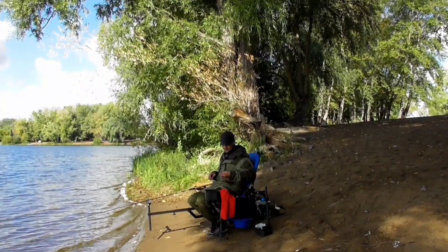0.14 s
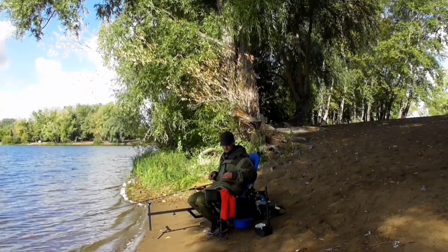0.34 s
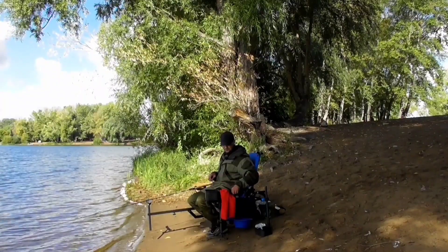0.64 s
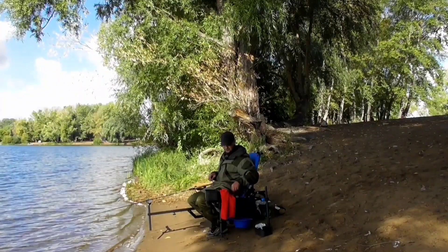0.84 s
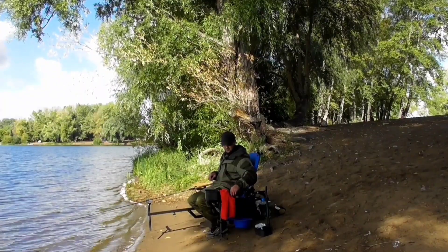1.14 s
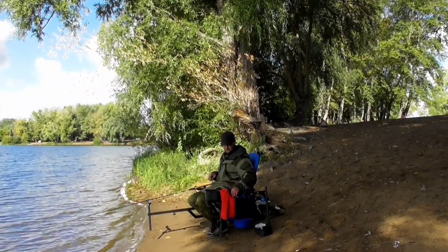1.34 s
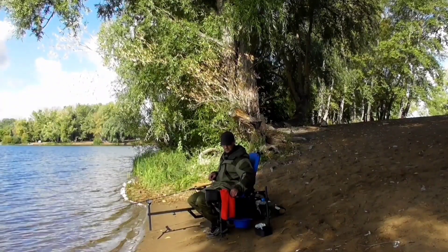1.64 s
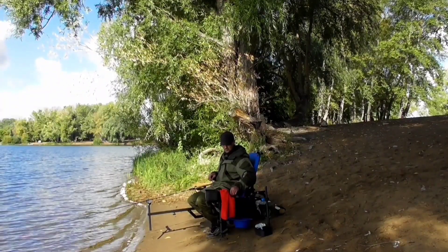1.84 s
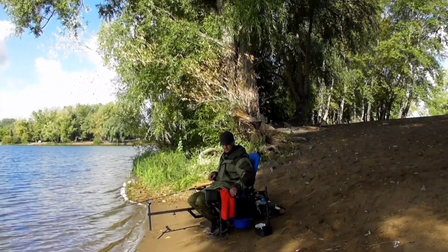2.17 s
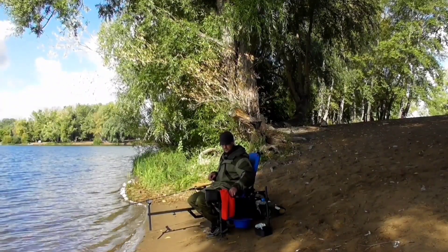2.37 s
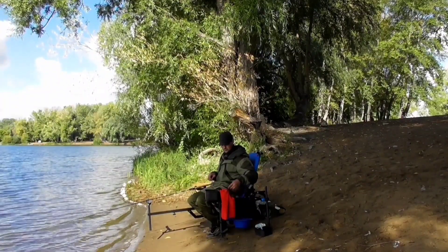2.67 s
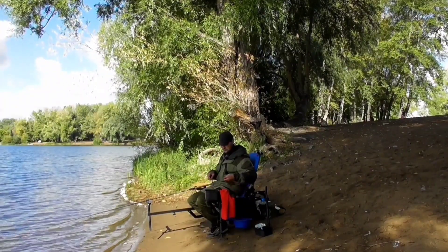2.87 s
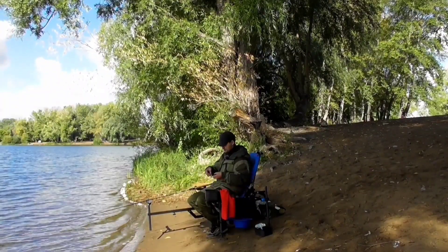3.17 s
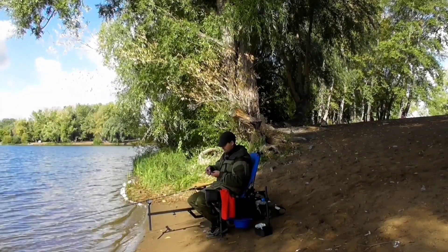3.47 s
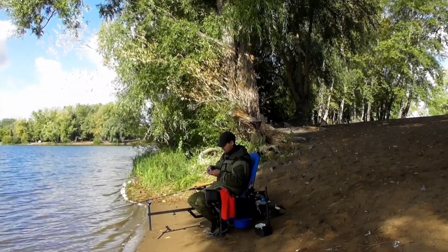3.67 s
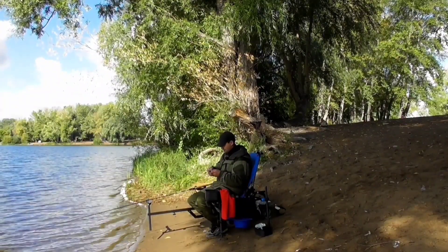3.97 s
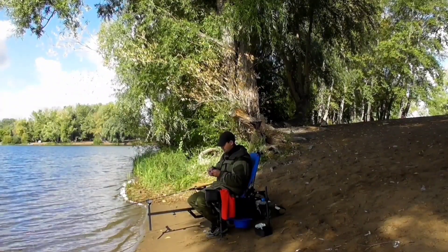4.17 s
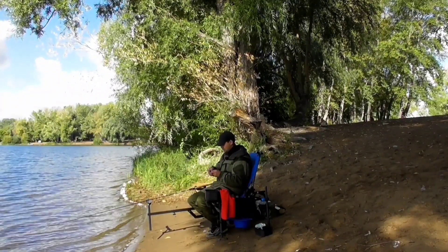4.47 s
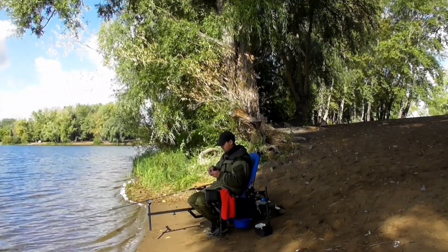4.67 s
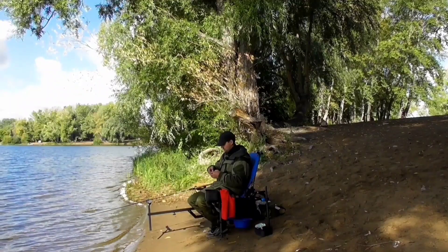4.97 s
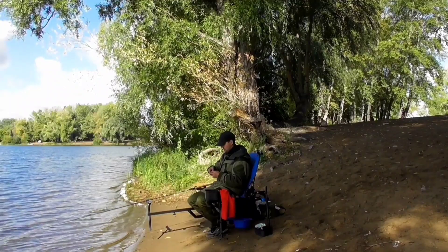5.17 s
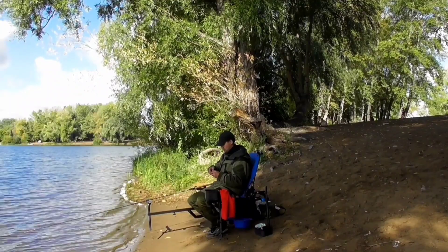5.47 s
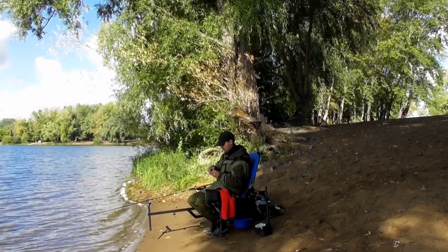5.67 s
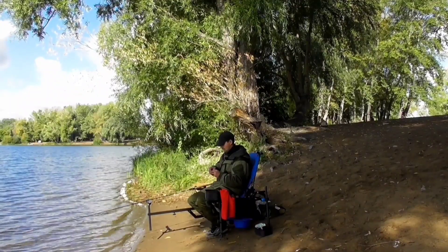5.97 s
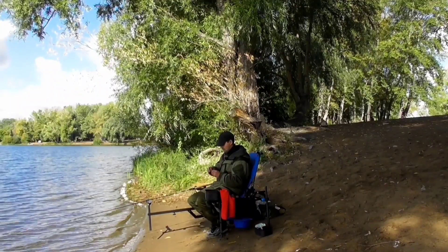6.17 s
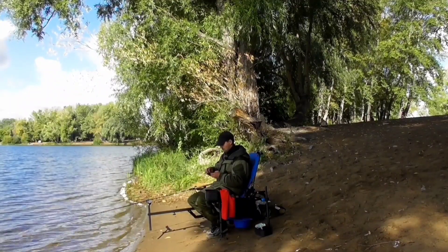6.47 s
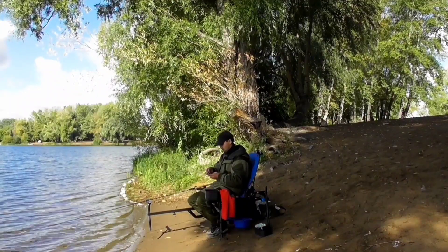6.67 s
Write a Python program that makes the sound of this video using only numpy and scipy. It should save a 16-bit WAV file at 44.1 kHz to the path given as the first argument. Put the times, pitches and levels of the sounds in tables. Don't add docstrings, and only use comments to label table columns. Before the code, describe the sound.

A dry outdoor lakeside heard from one bare microphone low by the water, close to a plastic tackle box. From 0 s small waves softly wash over sand, with foam fizz, gurgling air pockets, plinking drops and tiny crisp ticks. At 0.85-0.9 s the box is dragged and knocked, a hollow double thud. A raspy scrape runs 1.2-1.3 s; a hard bright rap lands at 1.52 s, followed by faint scrapes while the water swells around 1.75 s. At 2.0 s the clasp snaps shut, a very loud cluster of sharp cracks with a boxy thump, by far the loudest moment. Light scrapes and small knocks end near 2.6 s. Then lapping continues alone, with swells near 3.15, 4.0 and 5.5 s and quieter trickles between. Low wind rumble buffets throughout, gusting near 1.9, 3.5, 4.15 and 4.7 s, over a faint steady hiss.

```python
import sys
import numpy as np
from scipy import signal
from scipy.fft import rfft, irfft, next_fast_len
from scipy.io import wavfile
from scipy.ndimage import uniform_filter1d, map_coordinates

SR = 44100
rng = np.random.default_rng(int(sys.argv[2]) if len(sys.argv) > 2 else 0)


def wav_out(sig):
    wavfile.write(sys.argv[1], SR, np.round(np.clip(np.atleast_2d(sig).T, -1, 1) * 32767).astype(np.int16))


def level_to_linear(level):
    exponent = np.asarray(level, float) / 20
    return 10 ** exponent


N = 301070
T = np.arange(N) / SR


def unit(x):
    return x / np.sqrt(np.mean(x ** 2) + 1e-20)


def wobble(rate):
    knots = rng.standard_normal(int(N * rate / SR) + 4)
    return map_coordinates(knots, [np.arange(N) * rate / SR])


def filtered(x, response):
    m = next_fast_len(N + SR // 2)
    return irfft(rfft(x, m) * response(np.fft.rfftfreq(m, 1 / SR)), m)[:N]


def colour(points):
    f, db = np.transpose(points)
    return lambda hz: level_to_linear(np.interp(np.log(hz + 1), np.log(f + 1), db, left=-120, right=-120))


def resonant(modes):
    def response(f):
        total = 0
        for k, (centre, width, db) in enumerate(modes):
            damping = 1j * f * width
            total = total + (-1) ** k * level_to_linear(db) * damping / (centre * centre - f * f + damping)
        return total
    return response


def through(level, modes):
    force = rng.standard_normal(N)
    return filtered(level * force, resonant(modes)) / np.std(filtered(force, resonant(modes)))


def rush(spectrum, patchy_db):
    z = signal.stft(rng.standard_normal(N), nperseg=256)[2]
    field = uniform_filter1d(rng.standard_normal(z.shape), size=3, axis=0)
    field = uniform_filter1d(field, size=8, axis=1)
    noise = signal.istft(z * level_to_linear(patchy_db * unit(field)), nperseg=256)[1][:N]
    return unit(filtered(noise, colour(spectrum)))


def chirps(s, db, hz0, hz1, life, size):
    t = np.arange(size) / SR
    u = t / np.asarray(life)[:, None]
    glide = (hz1 - hz0)[:, None] * np.where(u < 1, u / 2, 1 - .5 / np.maximum(u, 1))
    shape = (1 - np.exp(-u / 0.097)) * level_to_linear(-9 * u - 1.6 * u ** 2) * 1.42
    tones = level_to_linear(db)[:, None] * shape * np.sin(2 * np.pi * (hz0[:, None] + glide) * t)
    at = np.round(s * SR).astype(int)[:, None] + np.arange(size)
    return np.bincount(at.ravel(), tones.ravel(), N + size + SR)[:N]


def swarm(level_db, count, hz, spread, cycles, rise, tail_db, size):
    chance = np.cumsum(level_to_linear(.5 * level_db))
    s = np.searchsorted(chance / chance[-1], rng.random(count)) / SR
    draw = rng.standard_normal((count, 3))
    pitch = np.clip(hz * np.exp(spread * draw[:, 0]), 250, 14000)
    life = cycles / pitch * np.exp(0.36 * draw[:, 1])
    size_db = tail_db * np.minimum(rng.exponential(size=count), 3)
    end_pitch = pitch * (1 + rise + 0.12 * draw[:, 2])
    x = chirps(s, size_db, pitch, end_pitch, life, size)
    return unit(x * level_to_linear(-.25 * level_db))


# [f/Hz, level/dB per Hz]
AIR_COLOUR = [(1500, -22), (3000, 4.5), (15000, -4)]


def hiss():
    return level_to_linear(-76) * rush(AIR_COLOUR, 0)


# [t/s, rumble level/dB]
GUSTS = [(0, -40), (1.1, -37), (1.9, -28.5), (2.8, -38), (3.5, -27.5), (3.8, -33.5), (4.15, -27),
         (4.35, -37.5), (4.7, -28), (5.3, -33.5), (6.2, -31), (6.83, -33.5)]
# [f/Hz, level/dB per Hz]
RUMBLE_COLOUR = [(4, -7), (12, 3), (25, -10), (50, -17.5), (100, -26.5), (200, -32.5), (400, -43.5),
                 (900, -65)]


def wind():
    gust_s, gust_db = np.transpose(GUSTS)
    level_db = np.interp(T, gust_s, gust_db)
    air = rush(RUMBLE_COLOUR, patchy_db=-2.5)
    lump_hz = 55
    lumps = filtered(air, lambda hz: 1 / (1 + (hz / lump_hz) ** 4))
    roar_db = -35 + 0.2 * (level_db - level_db.mean())
    return level_to_linear(0.66 * wobble(11)) * (level_to_linear(level_db) * lumps + level_to_linear(roar_db) * (air - lumps))


# [t/s, level/dB]
SURGE_FORCE = [(0, -57), (.75, -56), (1.0, -52), (1.749, -48), (2.2, -52), (2.43, -51), (2.7, -58.5),
               (2.93, -57.5), (3.149, -50.5), (3.58, -59), (4.0, -50.5), (4.3, -62), (4.851, -56.5),
               (5.2, -62.5), (5.52, -52), (5.78, -62), (6.47, -55.5), (6.83, -60)]


def surge(calm_db, grows, lead_s):
    s, db = np.transpose(SURGE_FORCE)
    return calm_db + grows * (np.interp(T + lead_s, s, db) + 58)


# [t/s, lift/dB, half length/s]
WAVELETS = [(.06, 3, .04), (0.574, 5, .04), (0.715, 5, .04), (2.931, 6, .05), (3.068, 5, .05),
            (3.752, 7, .06), (4.067, 5, .05), (4.469, 4, .04), (5.291, 4, .04), (5.501, 4, .05),
            (5.611, 5, .04), (5.932, 9, .04), (6.056, 5, .02), (6.322, 6, .03), (6.49, 6, .04),
            (6.772, 6, .03)]


def splash():
    return sum(db * np.exp(-((T - s) / half) ** 2) for s, db, half in WAVELETS)


# [f/Hz, level/dB]
GURGLE_COLOUR = [(200, -21), (350, -5.5), (550, -3), (900, -7), (1400, -20), (2500, -42)]
# [f/Hz, level/dB]
WASH_COLOUR = [(500, -31.5), (1000, -13), (1500, -2), (2500, -6), (4000, -12.5), (6000, -28.5)]
# [f/Hz, level/dB]
FIZZ_COLOUR = [(2000, -21.5), (4000, -2.5), (6000, -2.5), (8600, 1.5), (10000, -3.5), (11000, -14),
               (14700, -8), (16000, -16.5)]


def waves():
    lift_db, slosh = splash(), wobble(14)
    gurgle_db = surge(calm_db=-58, grows=1, lead_s=0)
    wash_db = surge(calm_db=-63, grows=.7, lead_s=.02) + lift_db
    fizz_db = surge(calm_db=-65.5, grows=0.62, lead_s=0.046) + 0.44 * lift_db
    pockets = swarm(gurgle_db, count=420, hz=620.3, spread=0.3603, cycles=10.4, rise=0.2,
                    tail_db=3.5, size=1600)
    gurgle = level_to_linear(-2.0) * rush(GURGLE_COLOUR, 4) + level_to_linear(-3) * pockets
    beads = swarm(wash_db, count=1200, hz=1750, spread=.42, cycles=9, rise=0.05,
                  tail_db=3.5, size=700)
    wash = level_to_linear(-3.5) * rush(WASH_COLOUR, 3.5) + level_to_linear(-2.5) * beads
    flutter = unit(level_to_linear(2.2 * wobble(300)))
    foam = swarm(fizz_db, count=600, hz=7000, spread=.33, cycles=4.5, rise=.03,
                 tail_db=4, size=200)
    fizz = level_to_linear(-1) * flutter * rush(FIZZ_COLOUR, 1.5) + level_to_linear(-6) * foam
    water = level_to_linear(gurgle_db - 0.17 + 1.8 * slosh) * gurgle
    water += level_to_linear(wash_db + 0.8 * slosh) * wash
    water += level_to_linear(fizz_db + .4 * slosh) * fizz
    return water


# [t/s, peak level/dB, start
# f/Hz, end f/Hz, life/s]
AIR_POCKETS = [(.299, -35, 553, 513, 0.0091), (.071, -33.5, 2940, 2440, .005), (.559, -42, 910, 880, 0.013),
               (1.666, -34.5, 863, 789, 0.025), (1.868, -33.5, 754, 750, 0.037),
               (2.395, -37, 460, 580, 0.02), (2.443, -34.5, 738, 814, .018),
               (1.712, -38, 1440, 1475, 0.016), (2.68, -44, 680, 1110, 0.018),
               (3.029, -39.5, 342, 343, 0.016), (3.602, -50, 1340, 1600, 0.012),
               (3.075, -49, 1410, 1750, 0.036), (3.122, -41.5, 850, 1175, .025),
               (3.223, -42.5, 1090, 1420, 0.011), (3.427, -44.5, 674, 630, 0.018),
               (3.686, -40, 536, 375, .013), (3.879, -45, 449, 553, 0.0476), (4.142, -41.5, 450, 490, .016),
               (4.629, -37.5, 562, 557, .016), (5.359, -37, 464, 520, 0.019), (5.513, -43, 562, 494, 0.021),
               (6.085, -45, 590, 760, 0.0247), (6.481, -43.5, 673, 812, 0.022),
               (6.769, -45, 510, 455, 0.023)]
# [t/s, peak level/dB, f/Hz]
DROP_PLINKS = [(4.951, -48, 2150), (.123, -45.5, 2230), (.195, -47, 1520), (.379, -45, 1260),
               (0.438, -36.5, 1135), (1.13, -38, 1420), (.226, -48, 2870), (1.819, -41, 2314),
               (1.866, -34.5, 2160), (2.452, -42, 2230), (2.94, -42, 2830), (2.961, -39, 3000),
               (3.223, -43, 2250), (3.32, -44.5, 1340), (3.391, -46, 1110), (3.457, -39.5, 1090),
               (6.479, -41, 1700), (3.717, -43.5, 1390), (3.786, -39, 2700), (3.794, -39.5, 1045),
               (4.034, -41, 886), (4.108, -36, 2030), (4.142, -43.5, 1940), (4.359, -45.5, 875),
               (4.627, -45, 1270), (5.441, -44, 2080), (5.508, -42.5, 2330), (6.321, -49, 2320),
               (6.47, -38.5, 2170), (6.512, -42.5, 1254)]


def bubbles():
    s, db, hz0, hz1, life = np.transpose(AIR_POCKETS)
    pockets = chirps(s, db, hz0, hz1, life, size=4000)
    s, db, hz = np.transpose(DROP_PLINKS)
    brief = 0.006 * 1000 / hz
    return pockets + chirps(s, db, hz, 1.023 * hz, brief, size=1500)


# [t/s, peak level/dB, f/Hz]
DROPLETS = [(0.3274, -40.5, 7700), (0.3622, -35, 6770), (0.4159, -37.5, 6800), (0.5375, -39.5, 7440),
            (0.6465, -41, 4300), (1.09, -40, 6330), (2.7472, -42.5, 5900), (1.5783, -39.5, 8520),
            (1.6057, -41, 6730), (.1481, -43, 7840), (1.832, -40.5, 6520), (0.4642, -44, 5880),
            (1.951, -36.5, 9370), (1.972, -36, 7300), (2.013, 1.5, 8280), (2.1414, -34.5, 9380),
            (2.2423, -39, 8540), (2.591, -38.5, 9500), (2.6212, -33, 7100), (2.94, -36.5, 3680),
            (3.0871, -37.5, 7600), (3.12, -39, 6650), (3.2422, -41, 6380), (3.5372, -32.5, 6620),
            (3.7896, -36.5, 6060), (4.108, -38.5, 4800), (4.6138, -30, 10550), (6.3617, -43, 5040),
            (6.451, -42, 3980), (6.644, -38, 8650)]
# [f/Hz, level/dB]
CRACK_COLOUR = [(2500, -6.5), (4000, -2.5), (5400, -8.5), (7000, -3), (8600, 0.5), (9700, -7),
                (10500, -16.5), (14700, -15.5), (16000, -27.5)]


def ticks():
    s, db, hz = np.transpose(DROPLETS)
    life = np.full(len(s), .0014)
    upper = np.minimum(1.6 * hz, 13500)
    rings = chirps(s, db - 3.5, hz, .97 * hz, life, size=300)
    rings += chirps(s, db - 7.0, upper, 0.62 * upper, 0.75 * life, size=300)
    spikes = np.bincount(np.round(s * SR).astype(int), level_to_linear(db - 6.0), N)
    decay = level_to_linear(-60 * np.arange(400) / SR / 0.019)
    snap = signal.fftconvolve(spikes, decay)[:N]
    return rings + filtered(snap * rng.standard_normal(N), colour(CRACK_COLOUR))


# [t/s, crack peak level/dB, body level/dB, thud level/dB, t60/s]
KNOCKS = [(.832, -30.5, -26, -31.5, 0.037), (0.8926, -19.5, -21, -19.5, 0.058),
          (0.8992, -19, -17, -26, 0.06), (.92, -31, -26.5, -34, 0.099), (1.0434, -34.5, -29.5, -44, 0.044),
          (1.2926, -37, -31, -46, 0.09), (1.508, -23, -24.5, -35.5, 0.074),
          (1.5204, -8.5, -15.5, -31, 0.057), (1.5337, -33, -22.5, -39, 0.067),
          (1.8643, -35, -32.5, -62, 0.086), (1.9001, -37, -47, -47.5, 0.073),
          (1.9811, -24, -27.5, -39.5, .06), (1.9891, -17, -22.5, -38, 0.073),
          (2.0105, -32.5, -17.5, -13, .045), (2.012, -3, -18.5, -12, 0.055), (2.0277, -3.5, -16, -20, .045),
          (2.0375, -10, -14.5, -36.5, .055), (2.047, -18, -22.5, -40.5, .1),
          (2.1254, -40.5, -38, -37, 0.14), (2.4534, -28.5, -43, -44, 0.026),
          (2.4646, -26.5, -40, -67, 0.02), (2.5401, -23, -19.5, -30, 0.031),
          (2.5544, -28, -26.5, -42, 0.078), (2.0182, -9.5, -19, -39.5, 0.059)]
# [start t/s, end t/s, body level/dB, rasp level/dB]
SCRAPES = [
    (0.838, 0.893, -34, -53),
    (1.204, 1.309, -32.5, -42.5),
    (1.466, 1.532, -33.5, -51),
    (1.604, 1.697, -39, -53),
    (1.763, 1.813, -43.5, -58),
    (1.88, 1.946, -44, -53),
    (2.045, 2.112, -34.5, -58),
    (2.104, 2.162, -43.5, -62),
    (2.257, 2.281, -44, -60),
    (2.412, 2.53, -41.5, -61),
]
# [f/Hz, width/Hz, level/dB]
BOX_WALLS = [(468, 137, 2.5), (649, 85, 1.5), (750, 87, 4), (965, 204, 0), (1330, 294, -3.5),
             (2200, 277, -5.5), (3260, 1300, -14)]
# [f/Hz, width/Hz, level/dB]
BOX_AIR = [(200, 29.6, -2), (260, 36.6, 0.5), (305, 60, -4)]
# [f/Hz, width/Hz, level/dB]
CLASP_MODES = [(4970, 140, 0.5), (7180, 120, -5), (7700, 160, -4), (8280, 90, -11), (9300, 160, 0),
               (9370, 150, 0)]


def tackle():
    body, push, crack = np.zeros((3, N))
    stutter = np.tanh(wobble(450))
    judder = wobble(60)
    u = T[:SR // 5]
    contact_s = 0.0046
    for s, crack_db, body_db, thud_db, t60 in KNOCKS:
        i = round(s * SR)
        after = np.maximum(u - contact_s, 0) / max(t60, .005)
        first = level_to_linear(7.5) * np.exp(-u / 0.00099)
        chatter = (1 - np.exp(-u / 0.0036)) * level_to_linear(3.54 * stutter[i:][:len(u)])
        grip = (1 - np.exp(-u / 0.00036)) * (first + chatter)
        body[i:][:len(u)] += (grip * level_to_linear(body_db - 0.95 - 60 * after)) ** 2
        crack[i:][:len(u)] += (grip * level_to_linear(crack_db - 11 - 90 * after)) ** 2
        push[i:][:88] += level_to_linear(thud_db + 18) * np.hanning(88)
    catch = level_to_linear(2.5 * stutter + 1.2 * judder) ** 2
    for start, end, body_db, rasp_db in SCRAPES:
        stroke = np.sin(np.pi * np.clip((T - start) / (end - start), 0, 1)) ** 1.25 * catch
        body += stroke * level_to_linear(body_db) ** 2
        crack += stroke * level_to_linear(rasp_db) ** 2
    bright = np.sqrt(crack) * rush(CRACK_COLOUR, 1.2)
    bright += level_to_linear(-8.0) * through(np.sqrt(crack), CLASP_MODES)
    walls = through(np.sqrt(body), BOX_WALLS)
    return walls + filtered(push, resonant(BOX_AIR)) + bright


def scene():
    return (hiss() + wind() + waves() + bubbles() + ticks() + tackle())[None]


def roll_off(x):
    return signal.sosfilt(signal.butter(12, 16510, fs=SR, output="sos"), x)


def record(dry):
    x = dry[0] / (1 + np.abs(dry[0] / .8) ** 6) ** (1 / 6)
    top_hz = 15300
    x = filtered(x, lambda hz: 1 / (1 + (hz / top_hz) ** 45))
    return roll_off(x[None])


dry = scene()
out = record(dry)
wav_out(out)
```